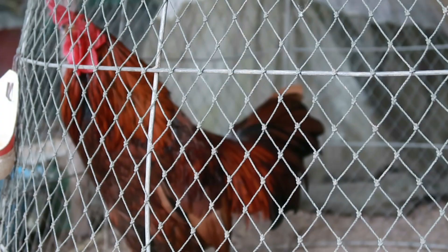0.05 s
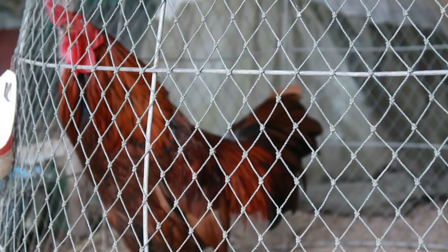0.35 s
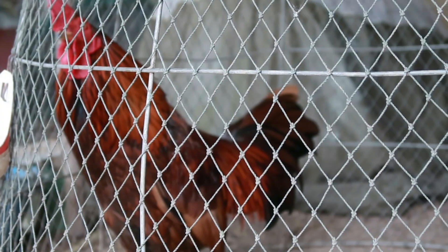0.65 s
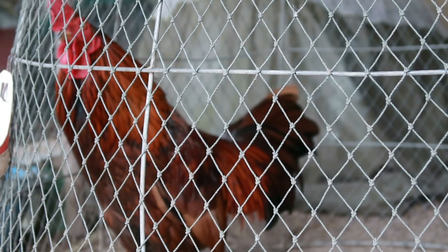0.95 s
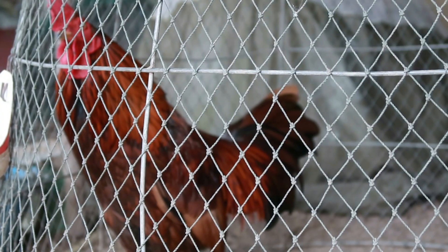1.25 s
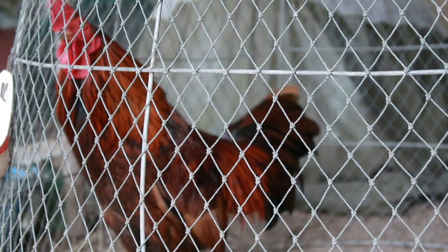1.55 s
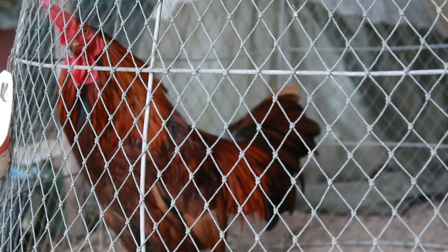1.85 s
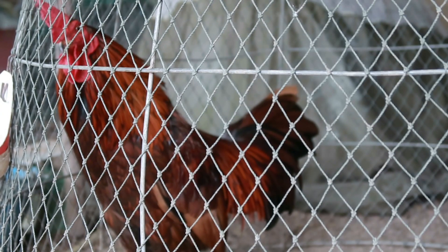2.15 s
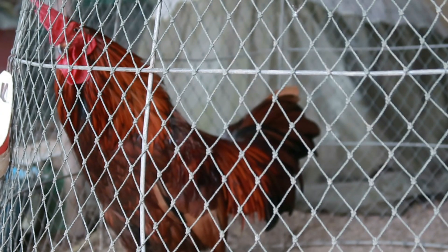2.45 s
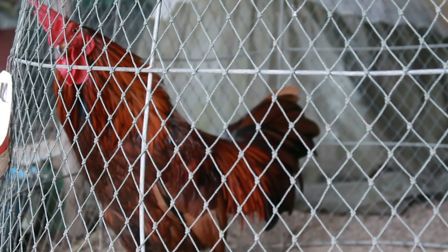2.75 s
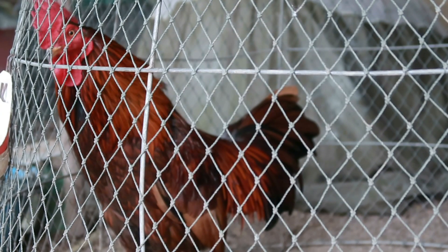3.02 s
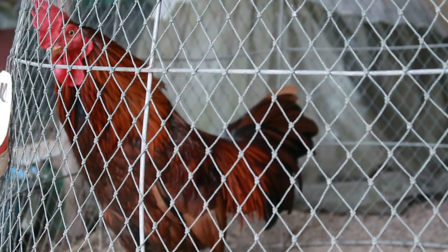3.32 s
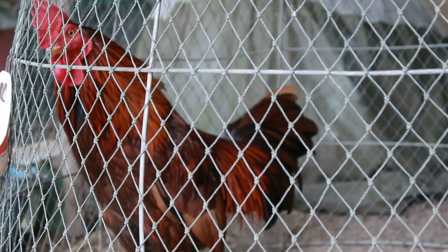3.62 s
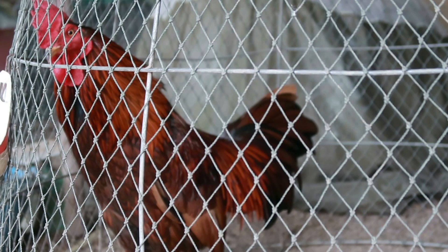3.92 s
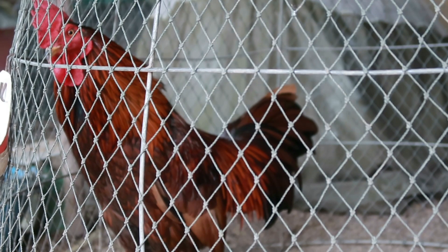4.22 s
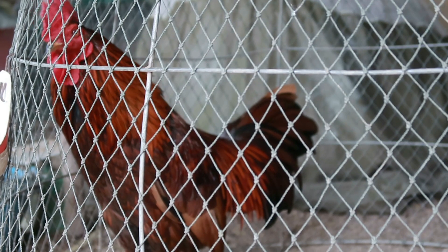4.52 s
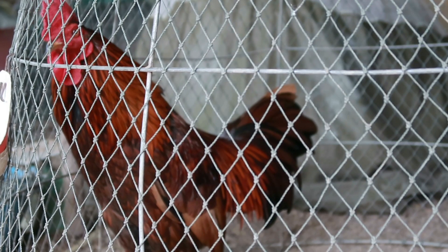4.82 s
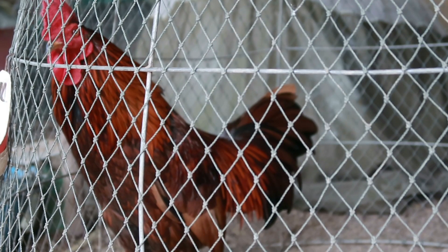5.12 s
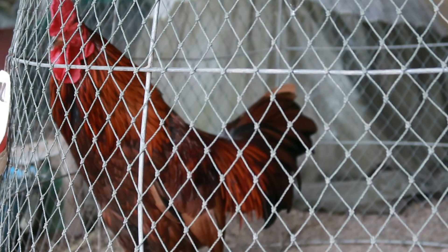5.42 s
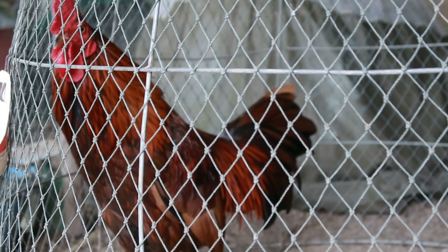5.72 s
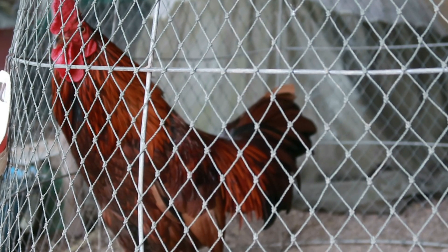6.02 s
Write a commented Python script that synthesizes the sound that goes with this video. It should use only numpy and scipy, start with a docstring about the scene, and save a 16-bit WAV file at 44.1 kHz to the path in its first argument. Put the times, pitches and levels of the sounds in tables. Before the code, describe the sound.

In a walled yard, faint high chirps and sparrow twitter repeat over the low, gradually swelling drone of a faraway engine. A soft thud and a few light ticks come first, then a sharp plastic click close to the microphone and a short run of tiny lens ticks. A rooster clucks softly twice, well apart. Toward the end comes a soft scuff, and a farther bird gives three raspy calls.

```python
"""A distant engine drones over rumble and hush, slowly gaining speed, while small birds chirp in a yard.
Its exhaust tones climb together over a rough roar; each bird note is a swept whistle with a short echo
off the walls. After a soft thud the camera body clicks, its plastic shell ringing, and its lens ticks
faintly. A rooster in a net pen gives two soft, hoarse clucks, and near the end something scuffs."""
import sys
import numpy as np
from scipy import signal
from scipy.fft import rfft, irfft, next_fast_len
from scipy.io import wavfile
from scipy.ndimage import uniform_filter1d, map_coordinates

SR = 44100
rng = np.random.default_rng(int(sys.argv[2]) if len(sys.argv) > 2 else 0)


def unload_audio(sound):
    """Save the sound as a 16-bit wav file, at the path given as the first command line argument."""
    columns = np.transpose(np.atleast_2d(sound))
    # keep every value between -1 and 1, then stretch to whole-number steps
    steps = np.round(np.clip(columns, -1, 1) * 32767)
    wavfile.write(sys.argv[1], SR, steps.astype(np.int16))


N = 267775

# Each voice's base echo level, in dB against its direct sound.
ECHO_DB = {"high": 0, "pip": -3, "chirrup": 1, "low": 2, "call": 2.5}
# Each voice's base pitch tremble, as a share of its pitch.
TREMBLE = {"high": .018, "pip": .01, "chirrup": .035, "low": .045, "call": .09, "cluck": .13, "flock": .1}
PURE = [(1, 0)]  # a sine: the first harmonic alone


def amp(db):
    """Decibels to gain."""
    return 10 ** (np.asarray(db) / 20)


def unit(x):
    """Scale to rms 1."""
    return x / np.sqrt(np.mean(x ** 2) + 1e-20)


def along(points, hz):
    """Read (Hz, value) points on a log frequency axis."""
    point_hz, values = np.transpose(points)
    return np.interp(np.log(hz + 1), np.log(point_hz + 1), values)


def curves(rows):
    """Turn timed rows into one per-sample curve for each column after the time."""
    times, *columns = np.transpose(rows)
    return [np.interp(np.arange(N) / SR, times, column) for column in columns]


def wobble(rate):
    """A smooth random curve with rate knots a second."""
    return map_coordinates(rng.standard_normal(int(N * rate / SR) + 4), [np.arange(N) * rate / SR])


def phase_of(hz):
    """Running phase of a moving pitch."""
    return 2 * np.pi * np.cumsum(hz) / SR


def filtered(x, response):
    """Equalise x with a gain given as a function of frequency."""
    size = next_fast_len(N + SR // 2)
    return irfft(rfft(x, size) * response(np.fft.rfftfreq(size, 1 / SR)), size)[..., :N]


def add(track, start, sound):
    """Mix a sound into a track from start seconds on."""
    part = track[..., max(round(start * SR), 0):][..., :sound.shape[-1]]
    part += sound[..., :part.shape[-1]]


def stereo_noise(spectrum):
    """Coloured noise of rms 1, mono in the bass and wide in the treble."""
    # Each row: frequency in Hz, side against mid in dB.
    width = [(60, -55), (100, -58), (180, -43.5), (300, -13), (510, -17.5), (880, -15.5), (1500, -11.5),
             (2560, -7), (4370, -3), (7470, 2.5)]

    def mid_side_gains(hz):
        angle = np.arctan(amp(along(width, hz)))
        return amp(along(spectrum, hz)) * [np.cos(angle), np.sin(angle)]

    mid, side = filtered(rng.standard_normal((2, N)), mid_side_gains)
    return unit(np.array([mid + side, mid - side]))


def in_yard(sound, wet_db, side_db=-1, wall_s=.015, wall_db=-8):
    """A mono sound with the nearest wall's reflection and a diffuse stereo tail."""
    # Each row: frequency in Hz, seconds the tail takes to fall 60 dB.
    reverb_times = [(300, 0.22), (3000, 0.36), (6000, 0.42), (10000, 0.17)]
    hz, t, noise = signal.stft(rng.standard_normal((2, SR // 3)), SR, nperseg=256)
    lingering = amp(-60 * t / along(reverb_times, hz)[:, None])
    early = amp(-3.5 - 60 * t / 0.12)  # close walls answer densely at first
    mid, side = signal.istft(noise * (lingering + early), SR, nperseg=256)[1]
    tail = np.array([mid + amp(side_db) * side, mid - amp(side_db) * side])
    tail[:, round(wall_s * SR)] += amp(wall_db) * np.linalg.norm(tail[0])
    tail *= amp(wet_db) / np.linalg.norm(tail[0])
    tail[0, 0] += 1  # the direct path reaches the left microphone port first
    tail[1, 1] += 1
    return signal.fftconvolve(sound[None], tail / np.linalg.norm(tail[0]), axes=1)


def note(length, pitches, harmonics, waver, bend):
    """A swelling, trembling note through start, turn and end pitch, turning at bend of its length."""
    progress = np.linspace(0, 1, max(round(length * SR), 16))
    hz = uniform_filter1d(np.interp(progress, [0, bend, 1], pitches), size=200)
    tremble = map_coordinates(rng.standard_normal(32), [progress * 31])
    phase = phase_of(hz * (1 + waver * tremble))
    voice = sum(amp(db) * np.sin(round(k) * phase) for k, db in harmonics)
    return unit(voice) * np.sin(np.pi * progress)


def calls(notes, harmonics, waver, bend, wet_db, side_db):
    """One voice's notes; the fainter a note, the farther away, so the more it blurs and echoes."""
    out = np.zeros((2, N))
    loudest = max(row[-1] for row in notes)
    for start, length, *pitches, db in notes:
        far_db = .5 * (loudest - db)
        sound = amp(db) * note(length, pitches, harmonics, waver * amp(far_db), bend)
        add(out, start, in_yard(sound, wet_db + far_db, side_db))
    return out


def engine(deep_order=7, main_order=8, roar_rise_db_per_s=1.21):
    """Exhaust tones, multiples of the cycle rate, climb together over a rough, growing roar."""
    # Each row: time in seconds, working cycles a second.
    speed = [(0, 8.75), (1.2, 8.84), (4, 9.39), (6.07, 9.52)]
    # Each row: time in seconds, then the levels of the deep, main and upper tones in dB.
    swells = [(0.0, -44, -35, -30), (0.5, -40, -24.5, -33), (0.75, -44, -33.5, -36.5), (0.9, -45, -21, -30),
              (1.03, -41, -35, -41), (1.13, -36.5, -21, -35.5), (1.8, -36.5, -21.5, -28.5),
              (2.3, -39, -23, -30.5), (2.55, -32, -25, -42), (2.75, -36.5, -24, -36),
              (3.45, -30.5, -26.5, -30.5), (3.8, -37, -18.5, -35.5), (4.0, -38, -25.5, -24.5),
              (4.2, -34, -18.5, -23), (4.38, -39, -27, -25.5), (4.65, -24.5, -22, -22.5),
              (5.12, -22, -20.5, -28.5), (5.3, -34, -26.5, -29), (5.5, -30, -26, -20.5),
              (5.75, -42, -24.5, -18.5), (6.07, -27.5, -14.5, -25.5)]
    # Each row: multiple of the cycle rate, level within the upper tones in dB.
    upper_orders = [(10, -9.5), (11, -7), (13, 0), (15, -15.5), (16, -13.5), (20, -20), (21, -17.5)]
    # Each row: frequency in Hz, relative noise density in dB.
    roar_spectrum = [(40, -13.5), (64, -5.5), (85, -4), (102, 1), (135, -2.5), (195, -2.5), (230, -13),
                     (275, -15), (330, -26.5), (600, -76.5), (2000, -120)]
    phase = phase_of(curves(speed)[0] * (1 + 0.0038 * wobble(5)))

    def tones(orders):
        return sum(amp(db + 0.94 * wobble(10)) * np.sin(round(k) * phase + 2 * np.pi * rng.random())
                   for k, db in orders)

    deep_db, main_db, upper_db = curves(swells)
    drone = tones([(deep_order, deep_db), (main_order, main_db)]) + amp(upper_db) * tones(upper_orders)
    roar_db = -35 + roar_rise_db_per_s * np.arange(N) / SR + 0.56 * wobble(3.81)
    return drone + amp(roar_db) * stereo_noise(roar_spectrum)


def open_air(hum_hz=275.2, hum_db=-49):
    """A bed of steady hush and deep rumble, with a wavering hum and far tones that come and go."""
    # Each row: frequency in Hz, relative noise density in dB.
    hush_spectrum = [(100, -24), (250, 0.5), (450, 2), (850, -2), (1400, -7), (2200, -12.5), (4000, -21),
                     (5500, -24.5), (7000, -28), (8500, -32), (11000, -39), (15000, -51)]
    rumble_spectrum = [(12, -21), (26, -13.5), (38, 0.5), (50, -8.5), (65, -2), (100, -6), (130, -12.5),
                       (250, -59), (1000, -120)]
    # Each row: time in seconds, base level in dB.
    hush_levels = [(0.0, -43.5), (0.39, -45), (3.8, -42.5), (4.45, -43.5), (5.38, -41.5), (6.07, -42)]
    rumble_levels = [(0, -33), (2.2, -31.5), (3.6, -33.5), (4.4, -32.5), (6.07, -34)]
    # Each row: start and length in seconds, pitch in Hz, level in dB.
    far_tones = [(0, .07, 490, -39), (.08, .2, 495, -47), (1.05, .6, 229, -44), (2.05, .5, 327, -45),
                 (2.6, .4, 326, -46), (2.33, .36, 431, -43.5), (2.62, .45, 433, -47),
                 (2.98, .7, 438, -46.5)]
    hush_db = curves(hush_levels)[0] + 2.5 + 0.5 * wobble(7)
    hush = amp(hush_db) * stereo_noise(hush_spectrum) * amp([[.4], [-.4]])  # leans slightly left
    rumble = amp(curves(rumble_levels)[0] + 1.4 * wobble(3.7)) * stereo_noise(rumble_spectrum)
    hum = amp(hum_db + 2.2 * wobble(6)) * np.sin(phase_of(hum_hz * (1 + 0.027 * wobble(20))))
    out = hush + rumble + hum
    for start, length, hz, db in far_tones:
        add(out, start, amp(db) * note(length, [hz] * 3, PURE, waver=.006, bend=.5))
    return out


def high_bird(note_s=.047, step_s=.05, pip_s=.028, pip_hz=(5170, 5180, 5260)):
    """A small bird whistles almost cleanly: pairs of drooping notes, pips and one rising whistle."""
    # Each row: start in seconds, pitch in Hz, relative levels of the first and second note in dB.
    pairs = [(0, 6280, -51, -64), (.732, 6320, -44, -44.5), (1.61, 6340, -55, -57), (2.121, 6400, -47, -49),
             (2.813, 6260, -45, -46), (3.629, 6240, -44.5, -54.5), (4.354, 6250, -43.2, -45.5)]
    # Start, turn and end of a held note, as shares of its pitch.
    droop = [1.01, .975, .955]
    # Pips close some calls. Each row: start in seconds, relative level in dB.
    closing_pips = [(2.218, -56), (2.908, -48.5), (3.722, -47), (4.457, -46.5)]
    notes = [(1.28, .079, 6500, 7220, 7260, -50)]  # the rising whistle
    for start, hz, first_db, second_db in pairs:
        held = hz * np.array(droop)
        flick = hz * np.array([.92, .83, .75])  # a faint downward flick ends the first note
        notes += [(start, note_s, *held, first_db),
                  (start + step_s, note_s, *held, second_db),
                  (start + .028, .024, *flick, first_db - 6)]
    pips = []
    for start, db in closing_pips:
        pips += [(start, pip_s, *pip_hz, db), (start + .06, pip_s, *pip_hz, db - 8.5)]  # faint repeat
    whistling = calls(notes, PURE, TREMBLE["high"], bend=.59, wet_db=ECHO_DB["high"], side_db=-.5)
    pipping = calls(pips, PURE, TREMBLE["pip"], bend=.4, wet_db=ECHO_DB["pip"], side_db=0)
    return amp(-0.3) * whistling + pipping


def far_flock(count=120):
    """Faraway sparrows twitter at random, blurred into echo."""
    twitter = np.zeros(N)
    for when, pitch, size in rng.random((count, 3)):
        sweep = (3100 + 1700 * pitch) * np.array([.9, 1.1, .8])
        chirp = note(0.056, sweep, PURE, TREMBLE["flock"], bend=0.63)
        add(twitter, when * N / SR, amp(-62 + 4 * size) * chirp)
    return in_yard(twitter, wet_db=13.5)[:, :N]


def thud(start=0.0337, length=0.043, hz=65, db=-20):
    """One soft thud: a few cycles of an unsteady bass tone."""
    out = np.zeros(N)
    add(out, start, amp(db) * note(length, [hz] * 3, PURE, waver=0.3, bend=.5))
    return out


def camera_clicks():
    """Each click rings the plastic shell and knocks and rattles the body holding the microphone ports."""
    # Each row: start in seconds, relative ring, knock and crack levels in dB, crack cutoff in Hz.
    clicks = [(0.3217, -42, -56.5, -38.5, 7950), (0.467, -35, -57, -31, 4970), (0.593, -35, -50, -29, 3620),
              (1.6054, -23.5, -50, -45, 7000), (1.6086, -5, -19, -28.5, 6980),
              (1.6175, -15.5, -28.5, -40, 6960)]
    # Each row: frequency in Hz, relative level in dB, seconds to fall 60 dB.
    shell_modes = [(2370, -24.5, 0.017), (2840, -29, 0.033), (3600, -28.5, 0.02), (4930, -2.5, 0.0035),
                   (5340, -7.5, 0.0026), (6360, -13, 0.0046), (7950, -28, 0.0054)]
    body_modes = [(250, -7, 0.087), (341, 1, 0.038), (496, -7.5, 0.019), (850, -30, .03),
                  (1180, -17.5, 0.033)]
    rocking_modes = [(378, 0, 0.12), (610, 1.5, 0.028), (1000, -0.5, 0.019), (1400, -12, 0.013),
                     (2340, -8, .01)]
    out, t = np.zeros((2, N)), np.arange(SR // 6) / SR

    def ringing(modes, wave):
        return sum(amp(db - 60 * t / t60) * wave(2 * np.pi * hz * t) for hz, db, t60 in modes)

    def burst(db, t60, cutoff_hz):
        noise = signal.lfilter(*signal.butter(2, cutoff_hz, fs=SR), rng.standard_normal(len(t)))
        return amp(db - 60 * t / t60) * noise

    contact = 1 - np.exp(-(t / 0.00024) ** 2)  # the contact force builds up smoothly
    for start, ring_db, knock_db, crack_db, crack_hz in clicks:
        crack = burst(crack_db, t60=.012, cutoff_hz=crack_hz)
        rattle = burst(crack_db + 4, t60=.02, cutoff_hz=5000)
        ring = amp(ring_db + 6) * ringing(shell_modes, np.sin)
        knock = amp(knock_db) * ringing(body_modes, np.sin)
        rocking = amp(knock_db + 3.5) * ringing(rocking_modes, np.cos)
        add(out, start, in_yard(contact * (ring + crack + knock), wet_db=-20.5))
        add(out, start, contact * (rocking + rattle) * [[1], [-1]])  # the ports move in opposition
    return out


def sparrows(chip_s=.03):
    """Sparrows some way off chatter in arched chirps and falling chips."""
    # Each row: start and length in seconds, nominal pitch in Hz, relative level in dB.
    chirps = [(0.892, 0.034, 3940, -45.5), (1.19, 0.029, 3870, -54), (1.253, 0.041, 4870, -53),
              (2.755, 0.038, 3200, -52), (3.433, 0.042, 3970, -48), (3.869, 0.042, 5890, -55.5),
              (4.117, 0.014, 3400, -48.5), (4.44, 0.039, 5580, -50), (4.493, 0.031, 5600, -57),
              (4.863, 0.039, 4480, -51.5), (4.668, 0.04, 3090, -51.5), (4.94, 0.049, 4840, -52),
              (4.99, 0.022, 3560, -47.5), (5.31, 0.028, 3140, -49.5), (5.855, 0.039, 3490, -46)]
    # Each row: start in seconds, top pitch in Hz, relative level in dB.
    chips = [(.525, 5100, -54), (.975, 5900, -53.5), (1.04, 4530, -52.5), (2.369, 5250, -52.5),
             (3.395, 6320, -58.5), (3.94, 4900, -53.5), (4.786, 6030, -52), (4.815, 5220, -56),
             (5.029, 4300, -47.5), (5.364, 6460, -47), (5.418, 6560, -51), (5.57, 4700, -56),
             (5.605, 4020, -51)]
    arch, slur = np.array([.8, .97, .74]), np.array([1, .85, .72])
    notes = [(start, length, *hz * arch, db) for start, length, hz, db in chirps]
    notes += [(start, chip_s, *hz * slur, db) for start, hz, db in chips]
    harmonics = [(1, 5), (2, -31)]
    return amp(1) * calls(notes, harmonics, TREMBLE["low"], bend=.56, wet_db=ECHO_DB["low"], side_db=-6.5)


def rooster(grunt_lead_s=.028, grunt_s=.019, grunt_hz=(297, 304, 335)):
    """Each soft, hoarse cluck follows a short, lower grunt."""
    # Each row: start and length in seconds, pitch in Hz, glide as a share of it, relative level in dB.
    clucks = [(1.561, 0.03, 432, -0.18, -30.5), (3.787, 0.0305, 385, 0.087, -30)]
    # Each row: harmonic number, relative level in dB.
    throat = [(1, 1), (2, 1.5), (3, -14.5), (4, -26.5)]
    notes = []
    for start, length, hz, glide, db in clucks:
        notes += [(start - grunt_lead_s, grunt_s, *grunt_hz, db - 3),
                  (start, length, hz * (1 - glide), hz, hz * (1 + glide), db)]
    return amp(0.5) * calls(notes, throat, TREMBLE["cluck"], bend=0.47, wet_db=0, side_db=-12.5)


def focus_motor(start=1.74, step_s=.037, scatter_s=.008, tick_hz=3600, db=-44, spread_db=4, count=24):
    """The lens ticks faintly in uneven steps, rocking the two microphone ports against each other."""
    out, swell = np.zeros(N), np.hanning(SR // 900)
    t = np.arange(len(swell)) / SR
    for k, (late, size, detune) in enumerate(rng.standard_normal((count, 3))):
        tick = swell * np.sin(2 * np.pi * tick_hz * (1 + .08 * detune) * t)
        add(out, start + k * step_s + scatter_s * late, amp(db + spread_db * size) * tick)
    return out * np.array([[1], [-1]])


def near_sparrows():
    """Each chirrup is one quickly sweeping whistle: a tall arch of pitch, then a lower one."""
    # Each row: start in seconds, top pitch in Hz, level in dB.
    chirrups = [(3.05, 4910, -41.5), (4.348, 4970, -41.5)]
    # Each row: seconds into the chirrup, share of the top pitch, gain from 0 to 1.
    contour = [(0, .55, 0), (.017, .75, .7), (.039, 1, .9), (.05, .73, .9), (.06, .6, 0), (.072, .58, .1),
               (.088, .6, .8), (.106, .76, 1), (.12, .57, 0)]
    out = np.zeros((2, N))
    when, share, gain = np.transpose(contour)
    t = np.arange(round(when[-1] * SR)) / SR
    for start, top_hz, db in chirrups:
        hz = top_hz * np.interp(t, when, share) * (1 + TREMBLE["chirrup"] * wobble(500)[:len(t)])
        whistle = amp(db) * np.interp(t, when, gain) * unit(np.sin(phase_of(hz)))
        add(out, start, in_yard(whistle, ECHO_DB["chirrup"], side_db=-10.5))
    return out


def scuff(start=5.138, rise_s=0.03, fade_s=0.15, db=-34.5):
    """A soft scuff of midrange noise that swells quickly and dies away."""
    # Each row: frequency in Hz, relative noise density in dB.
    spectrum = [(150, -4), (450, 15), (1050, 10.5), (1500, 14), (2200, 4.5), (3500, -0.5), (5000, -13.5),
                (9000, -45)]
    t = np.maximum(np.arange(N) / SR - start, 0)
    envelope = np.minimum(t / rise_s, 1) * np.exp(-t / fade_s)
    return amp(db) * envelope * unit(stereo_noise(spectrum).mean(axis=0))


def low_bird(call_s=.066, call_hz=(2450, 2900, 2100)):
    """A farther, lower bird lifts and drops a raspy call three times, smeared by the yard."""
    # Each row: start in seconds, relative level in dB.
    repeats = [(5.448, -45.5), (5.712, -44), (5.933, -43)]
    notes = [(start, call_s, *call_hz, db) for start, db in repeats]
    return amp(2.5) * calls(notes, PURE, TREMBLE["call"], bend=.363, wet_db=ECHO_DB["call"], side_db=-5)


def scene():
    """Everything heard at the pen."""
    birds = high_bird() + near_sparrows() + sparrows() + low_bird() + far_flock() + rooster()
    return engine() + open_air() + birds + camera_clicks() + focus_motor() + scuff() + thud()


def record(dry):
    """The camera's band limit cuts off the highest treble."""
    return filtered(dry, lambda hz: hz < 15100)


dry = scene()
out = record(dry)
unload_audio(out)
```